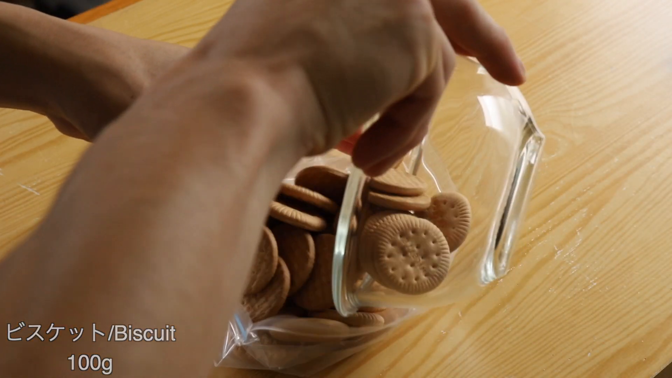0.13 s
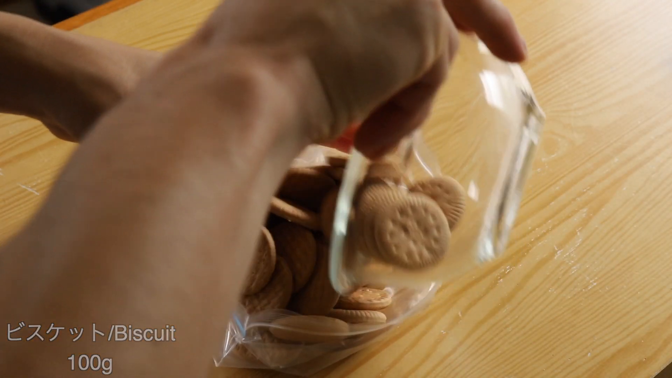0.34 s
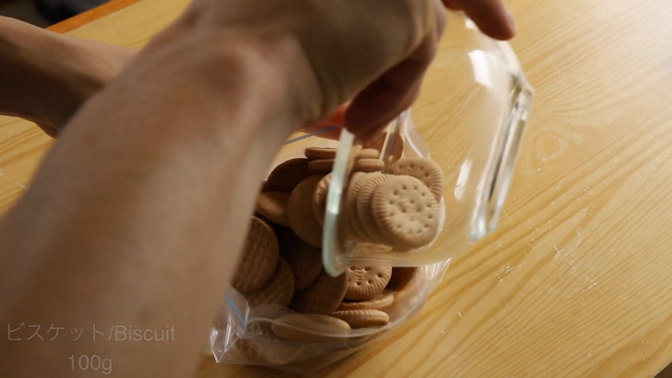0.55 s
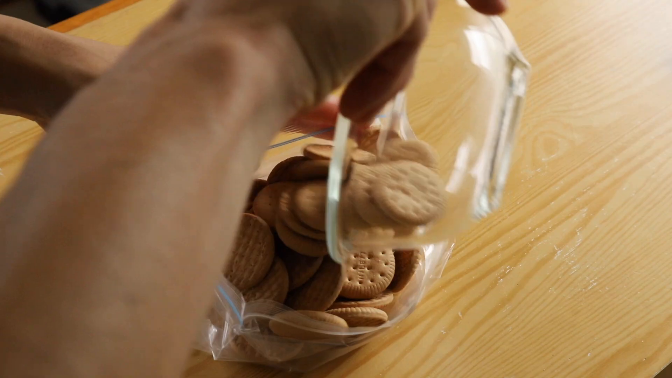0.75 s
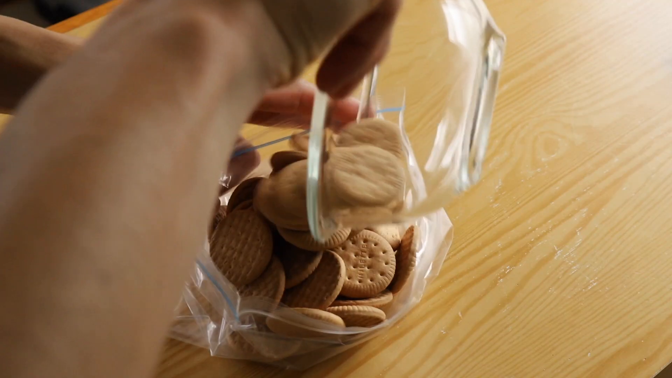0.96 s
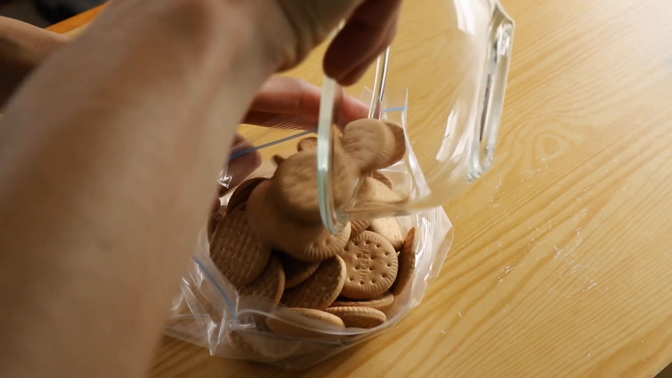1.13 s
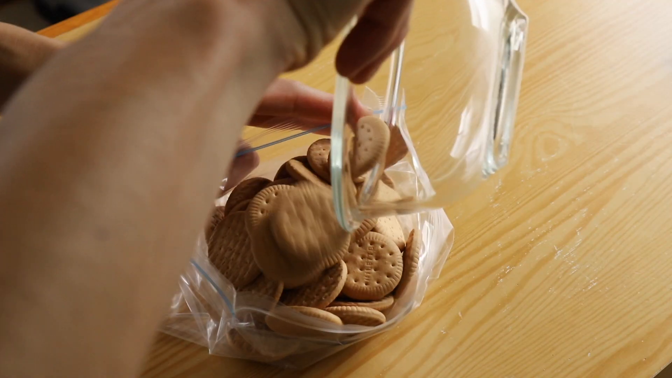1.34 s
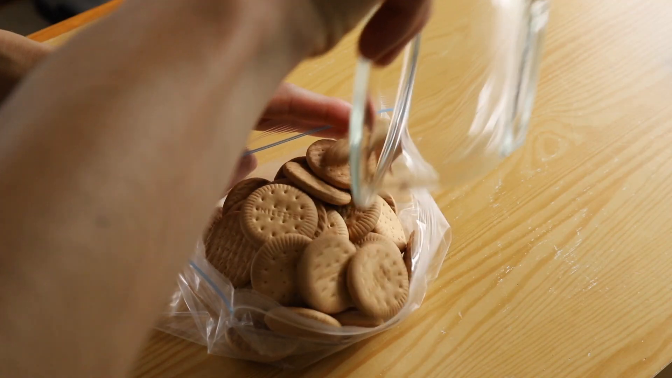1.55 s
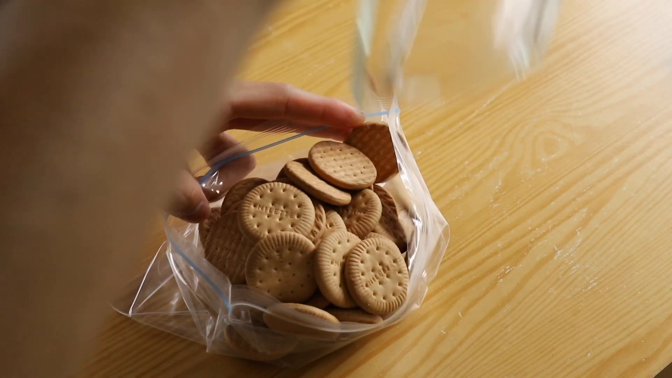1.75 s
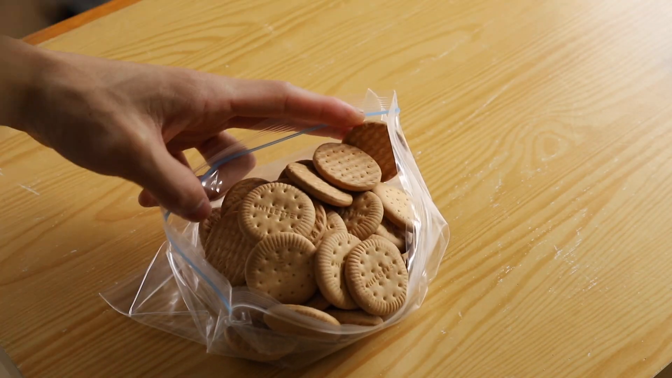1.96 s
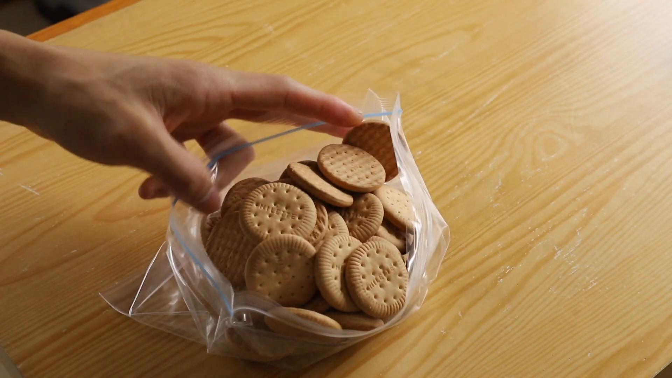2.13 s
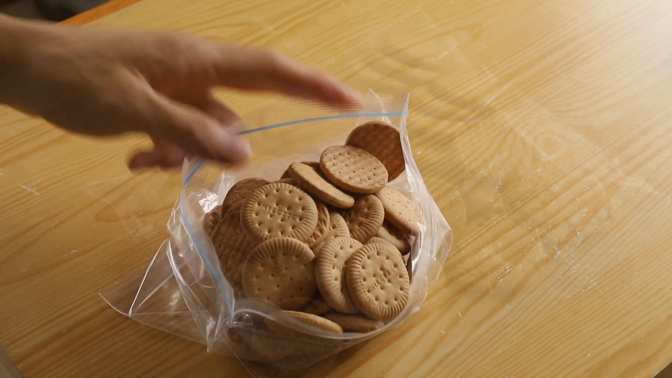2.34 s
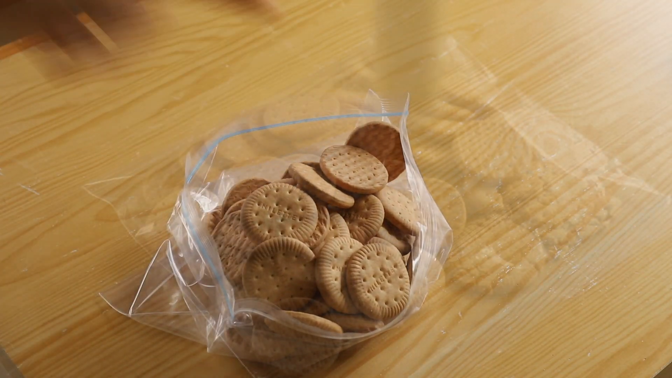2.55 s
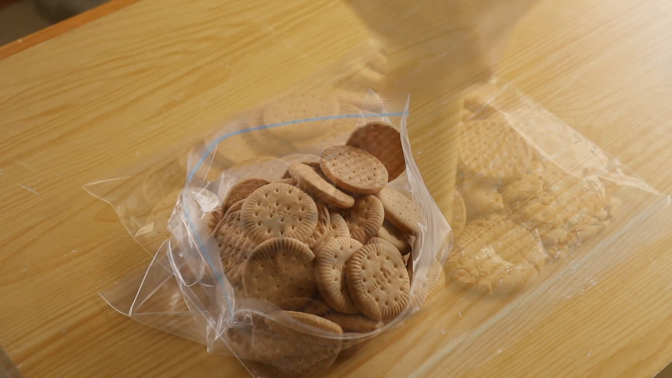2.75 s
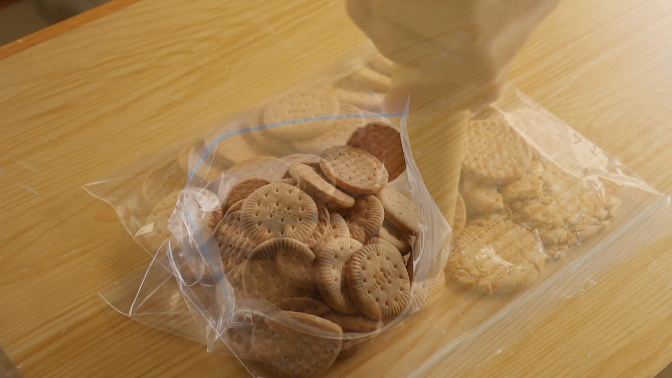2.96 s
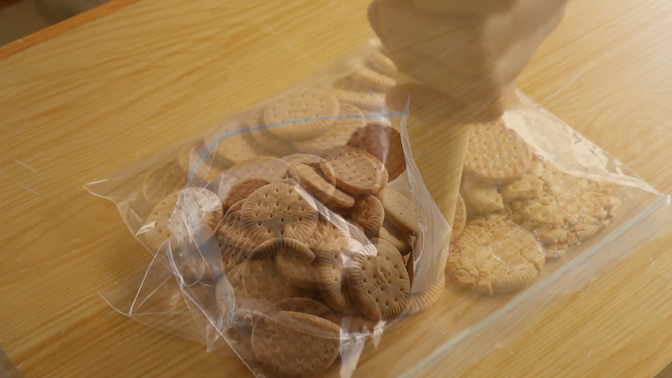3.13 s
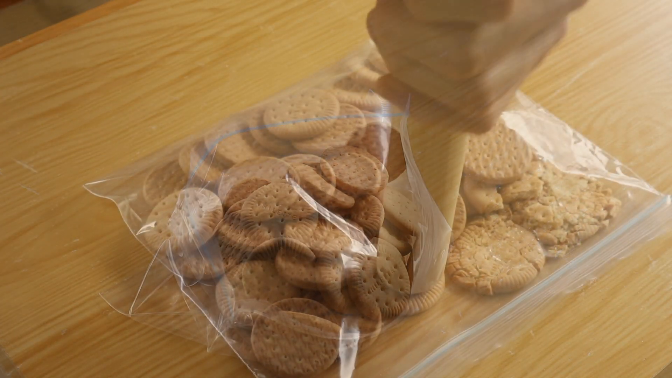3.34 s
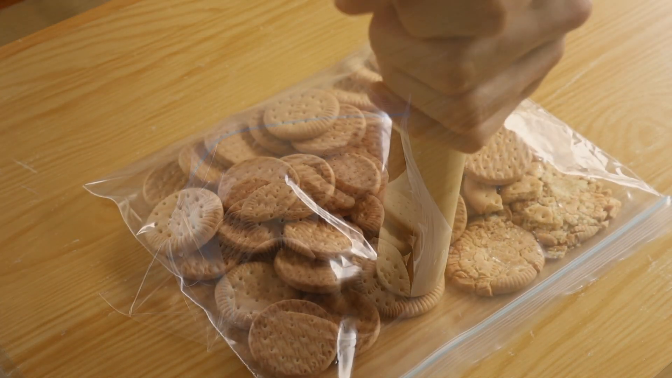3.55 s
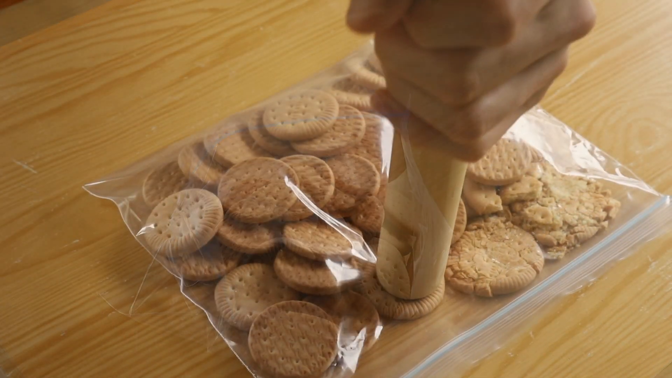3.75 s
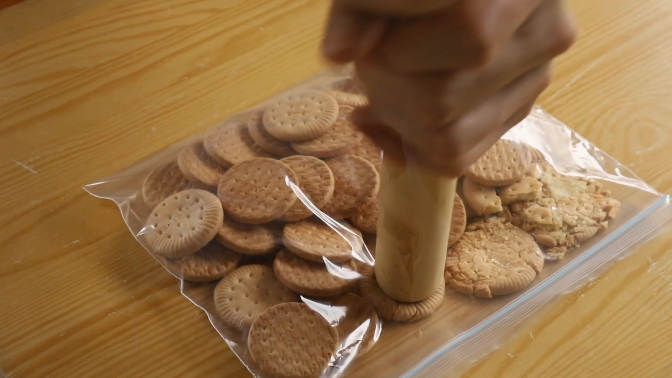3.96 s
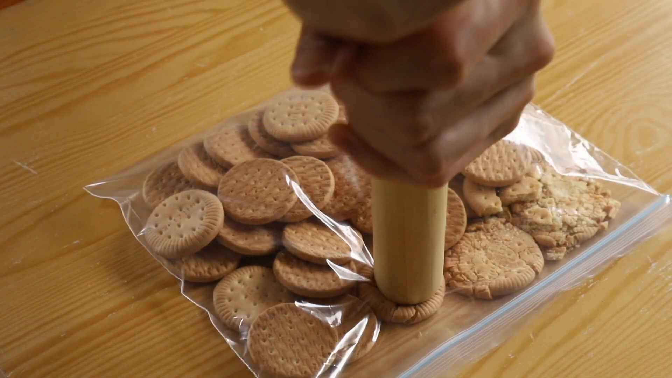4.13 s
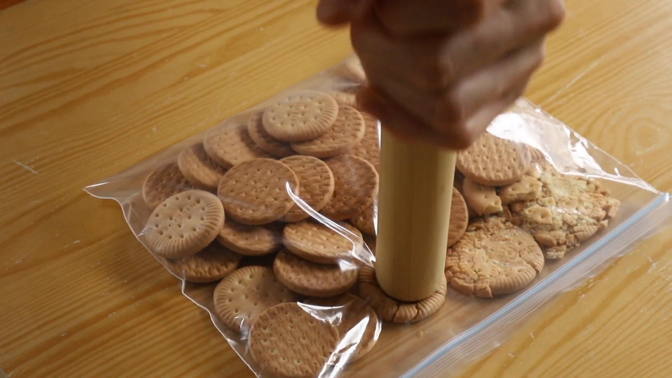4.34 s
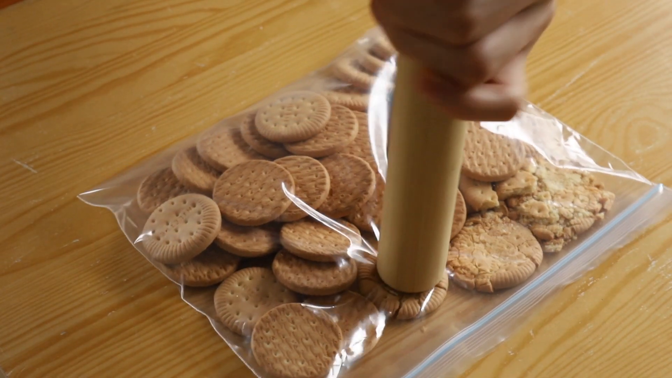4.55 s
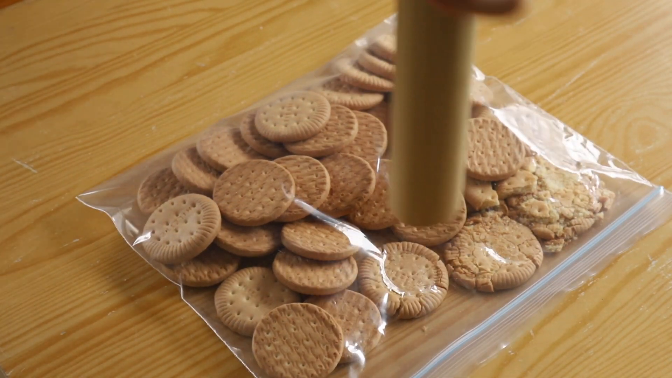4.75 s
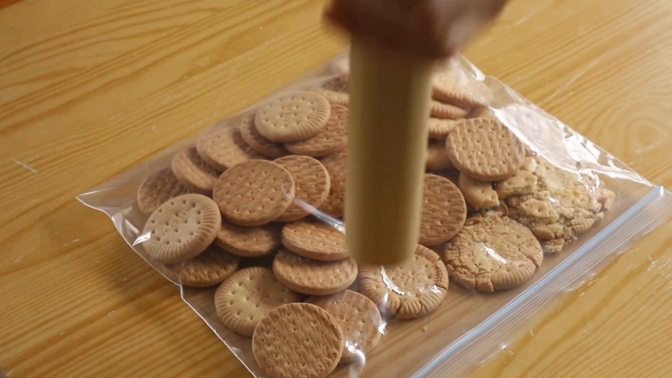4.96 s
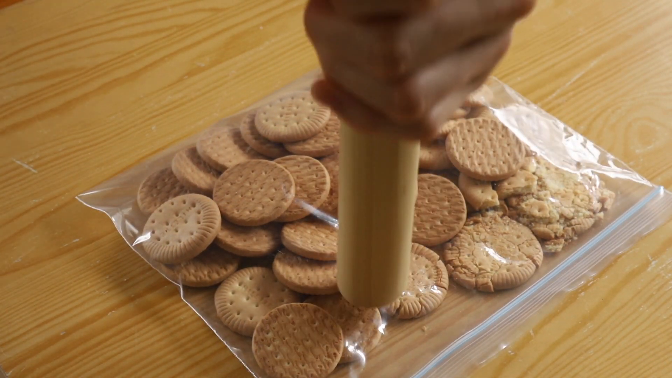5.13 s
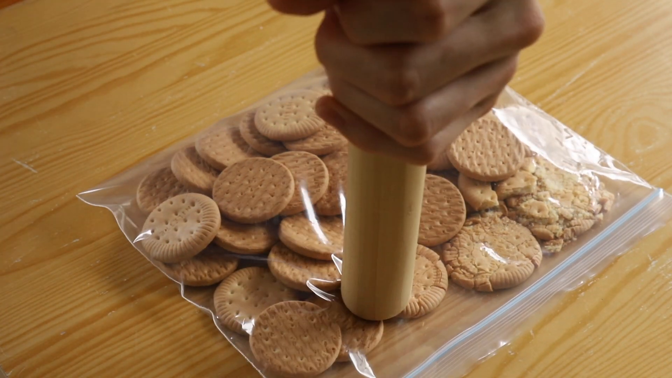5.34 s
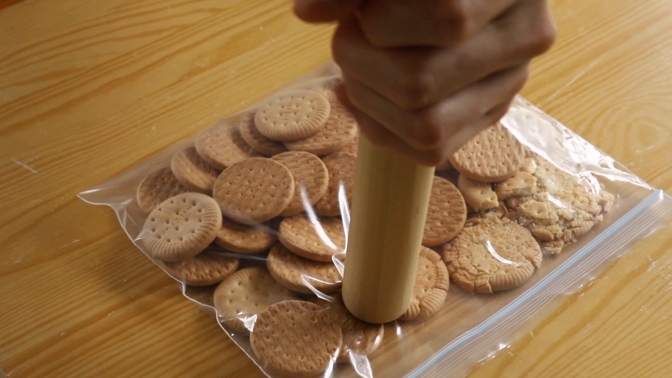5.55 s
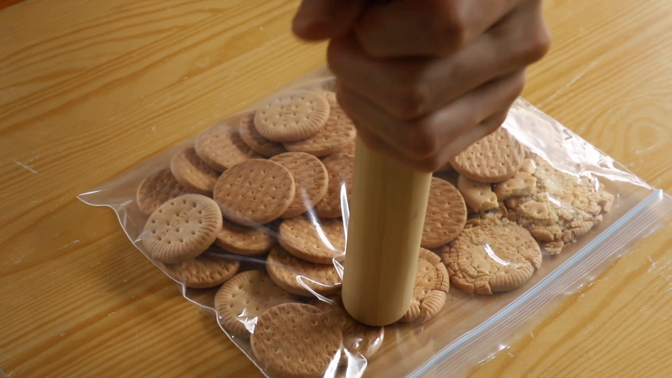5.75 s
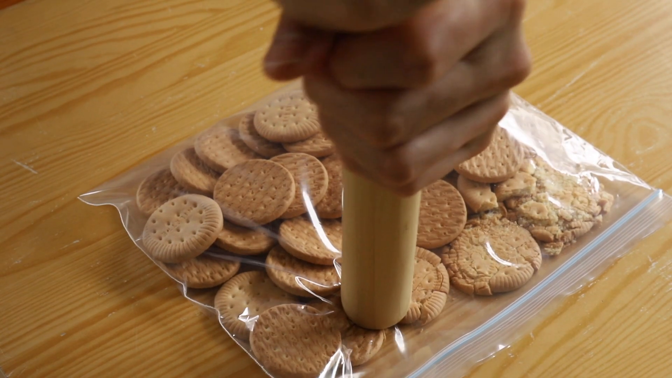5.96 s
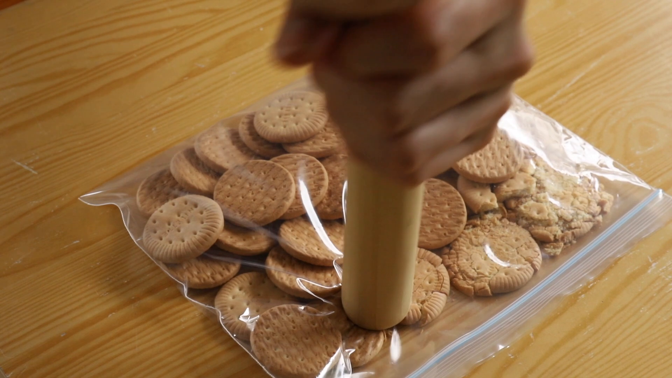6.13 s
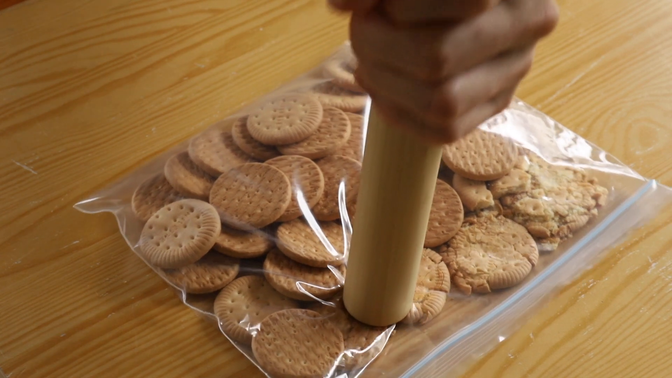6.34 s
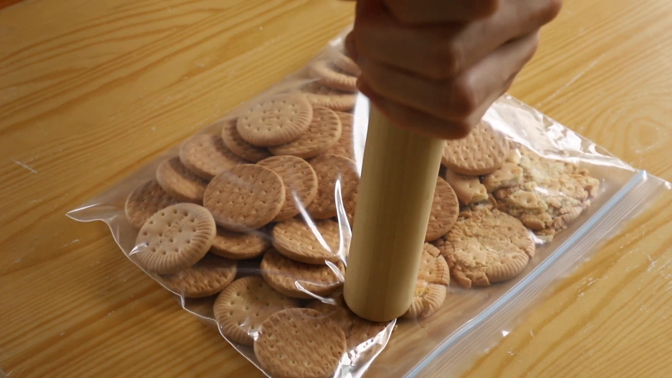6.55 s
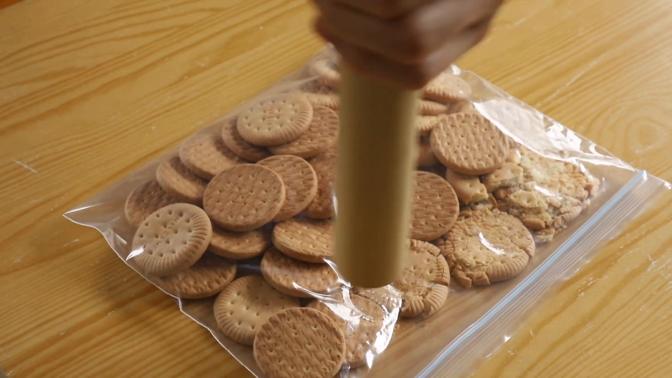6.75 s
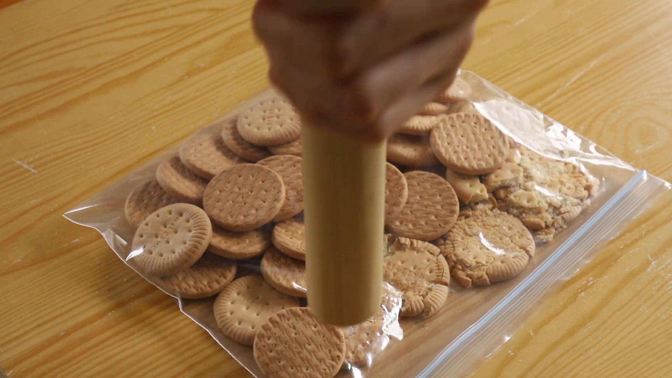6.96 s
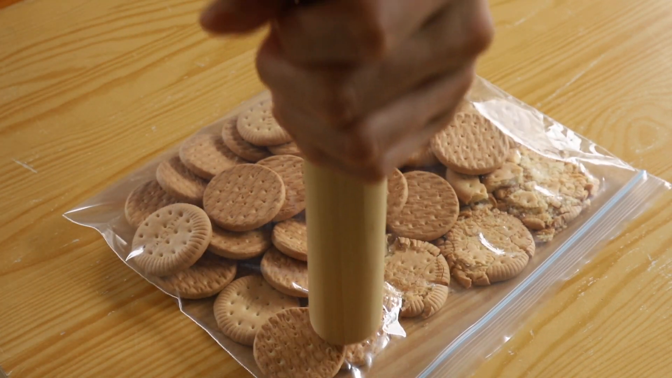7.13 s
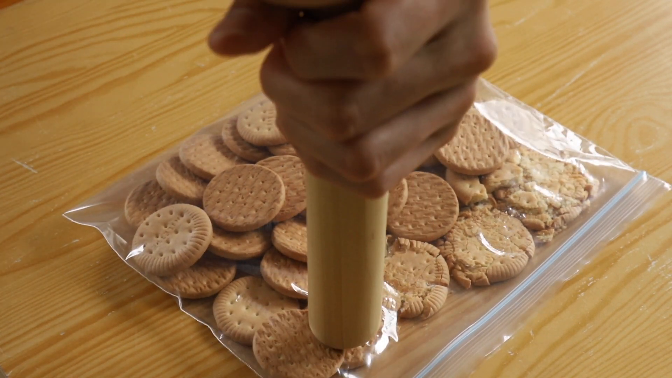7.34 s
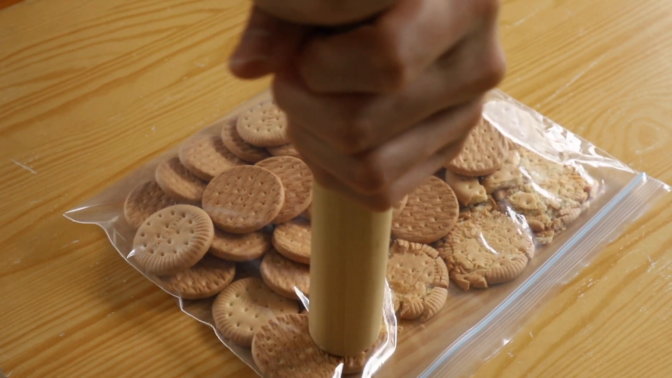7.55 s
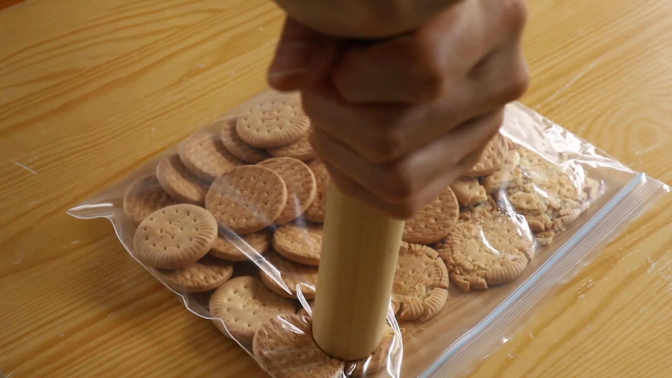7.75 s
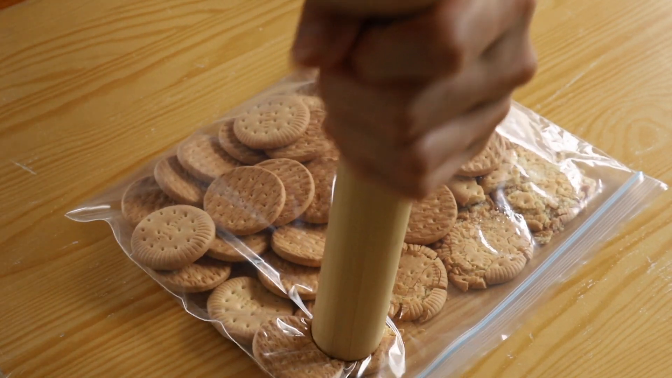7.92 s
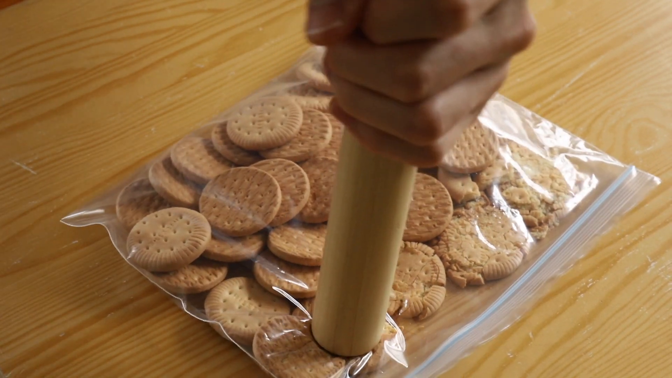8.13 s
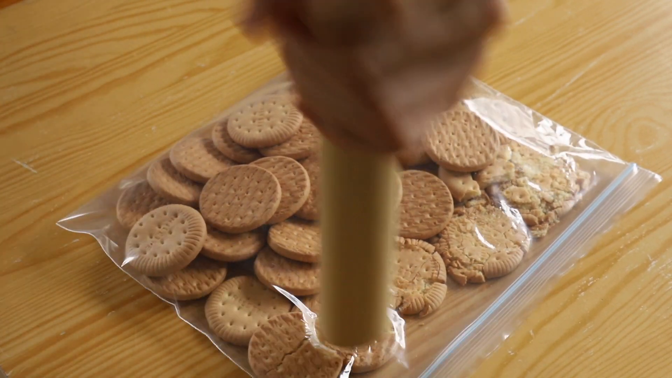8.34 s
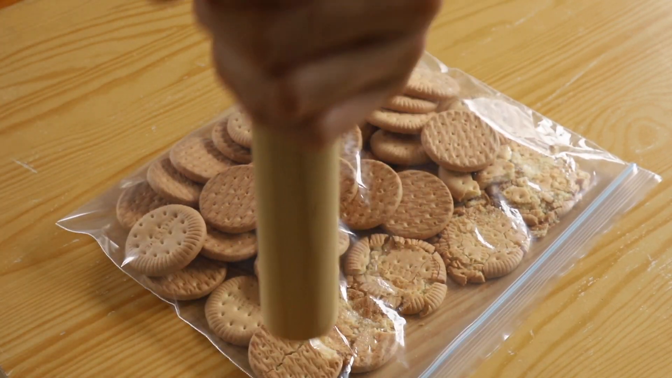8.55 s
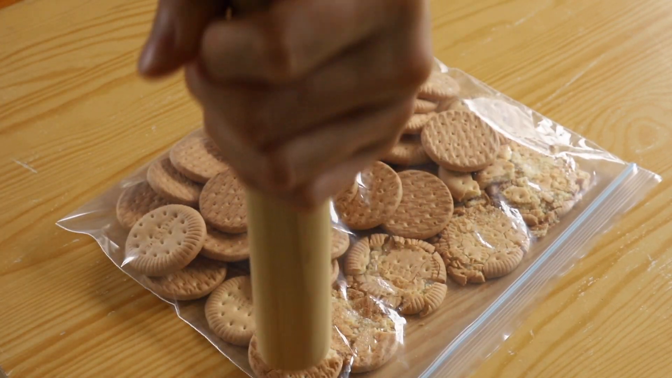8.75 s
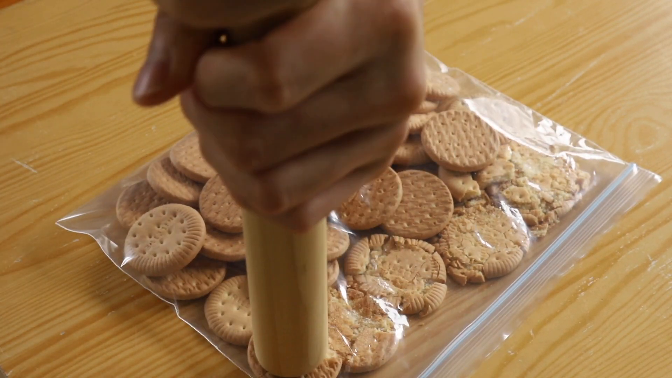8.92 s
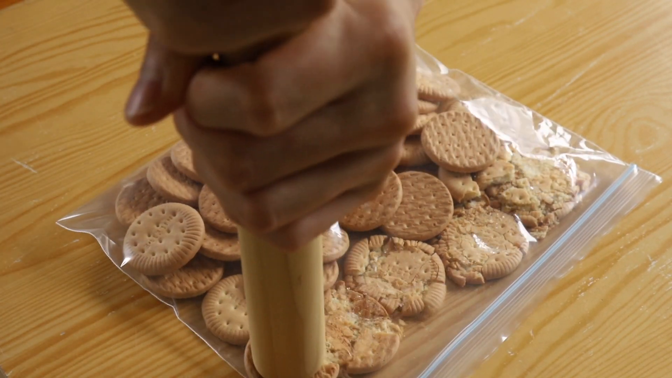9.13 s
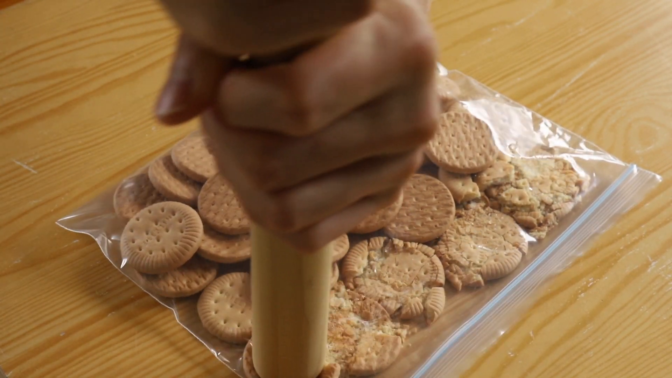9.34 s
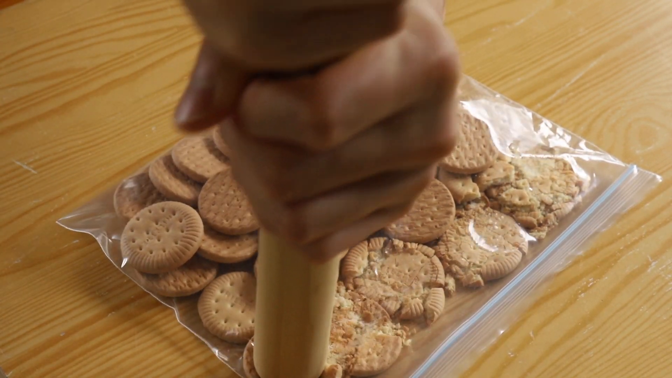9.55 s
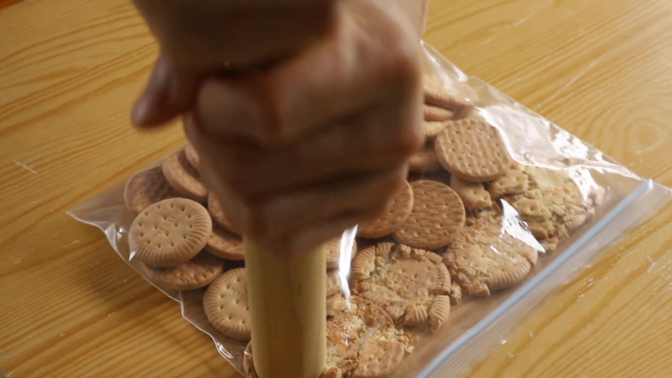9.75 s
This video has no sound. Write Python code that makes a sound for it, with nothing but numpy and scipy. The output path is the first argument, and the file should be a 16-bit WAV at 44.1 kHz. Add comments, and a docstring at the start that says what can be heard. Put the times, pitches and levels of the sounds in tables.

```python
"""A small kitchen, heard close and in stereo: biscuits slide from a glass dish into a plastic bag on a
wooden table, and a hand straightens the bag. Then the end of a rolling pin presses down four times:
biscuits snap, the pin knocks the table through them and the crumbs grind as it twists.
Blows are pulses scattered in the heap, rubbing is showers of tiny slips, and the dish and the table bounce
are decaying sines; table modes, sparse reflections and coloured room noise surround them."""
import sys
import numpy as np
from scipy import signal
from scipy.fft import rfft, irfft, next_fast_len
from scipy.io import wavfile

SR = 44100
rng = np.random.default_rng(int(sys.argv[2]) if len(sys.argv) > 2 else 0)


def master_out(mix):
    """Clip the mix to full scale and print it as 16-bit PCM to the path in sys.argv[1]."""
    frames = np.transpose(np.atleast_2d(mix))
    ceiling = np.clip(frames, -1, 1)
    pcm = np.round(ceiling * 32767).astype(np.int16)
    wavfile.write(sys.argv[1], SR, pcm)


N = 436149
STEP_S = .001  # spacing of the level curves

# presses of the pin: touch t/s, grind start t/s, ease-off t/s, end of resting t/s, resting level/dB,
# grinding level/dB; the last press grinds on to the end
PRESSES = [(3.465, 3.67, 4.54, 4.72, -62.5, -45), (5.247, 5.739, 6.484, 6.7, -66, -42.5),
           (7.216, 7.584, 8.12, 8.37, -61.5, -40.5), (8.907, 9.07, 14.6, 9.04, -74, -46)]
# the biscuit strains and crackles just before it gives way: t/s, level/dB
STRAINS = [(3.475, -45.5), (3.549, -38.5), (5.599, -45.5), (7.51, -33), (9.166, -31)]
# the wrist twists and bears down harder: middle t/s, time to fall 20 dB/s, level/dB
TWISTS = [(4.058, 0.11, -37), (4.302, 0.15, -36), (4.465, 0.047, -40.5), (5.909, 0.067, -34),
          (6.219, 0.12, -32), (6.361, 0.092, -40.5), (7.682, 0.067, -26.5), (7.919, 0.044, -40),
          (8.008, 0.14, -35.5), (9.062, 0.021, -31.5), (9.406, 0.23, -40), (9.63, 0.29, -39.5),
          (9.89, 0.17, -37.5)]
BITE_S, EASE_S = 0.068, 0.027  # the grinding builds up and dies away by 20 dB


def force():
    """How hard the pin works as it rests, strains a biscuit, bears down, twists and eases off: (times, dB)."""
    t = np.arange(PRESSES[0][0] - .1, N / SR, STEP_S)
    resting = [held(t, touch, rest_end, db, attack_s=.01, release_s=0.027)
               for touch, _, _, rest_end, db, _ in PRESSES]
    straining = [held(t, s, s, db, attack_s=.025, release_s=.02) for s, db in STRAINS]
    grinding = [held(t, bite, ease, db, BITE_S, EASE_S) for _, bite, ease, _, _, db in PRESSES]
    return t, together(resting + straining + grinding + [swells(t, TWISTS)])


# biscuits breaking under the pin: t/s, clack level/dB, table thud level/dB, snap level/dB,
# snap decay constant/s, ring f/Hz
BREAKS = [(3.473, -21, -30.5, -33, 0.0024, 950), (3.55, -6.5, -18.5, -22.5, 0.0033, 1200),
          (3.615, -8.5, -24, -27.5, 0.0014, 1840), (3.769, -14, -27, -18, 0.0018, 1830),
          (3.821, -15, -28, -21, 0.002, 1300), (3.888, -17.5, -34, -28.5, 0.00091, 1910),
          (4.304, -22.5, -55, -29, 0.002, 2070), (5.6, -17.5, -22.5, -22, 0.0028, 2635),
          (5.604, -6.5, -14, -27, 0.002, 924), (5.644, -18.5, -33, -56, 0.002, 885),
          (5.74, -28.5, -37.5, -33, 0.0024, 1700), (5.853, -29.5, -37.5, -36, 0.002, 802),
          (5.894, -25.5, -34.5, -29, 0.0023, 820), (5.909, -20.5, -28, -28.5, 0.003, 970),
          (6.054, -36, -44, -37.5, 0.002, 950), (6.225, -19.5, -36, -31.5, 0.0022, 997),
          (7.509, -8, -18.5, -19, 0.002, 797), (7.575, -10.5, -11, -18.5, 0.0048, 1290),
          (7.588, -16.5, -26.5, -25, 0.0031, 810), (7.599, -12, -32, -23, 0.0037, 1385),
          (7.671, -19.5, -24, -24.5, 0.002, 1240), (7.687, -16, -23, -27.5, 0.002, 824),
          (7.743, -23.5, -33.5, -26.5, 0.0024, 800), (9.025, -24, -34, -27.5, 0.0018, 1670),
          (9.059, -24, -28, -25, 0.002, 1230), (9.081, -22, -33, -26, 0.0025, 2210),
          (9.164, -6.5, -13, -14.5, 0.0021, 926), (9.177, -10, -30, -16.5, 0.0026, 1235),
          (9.308, -16, -25.5, -22, 0.0052, 1640), (9.322, -15, -22, -16.5, 0.0042, 1220),
          (9.337, -5, -14.5, -12, 0.0016, 2160), (9.342, -9, -21, -18.5, 0.0024, 1148),
          (9.474, -27.5, -35, -29.5, 0.0017, 2260)]
# light knocks as the hand or the pin meets or leaves the bag: columns as BREAKS
NUDGES = [(2.443, -42, -40, -52, 0.006, 1130), (3.204, -44.5, -34.5, -53.5, 0.0074, 930),
          (4.633, -44, -61, -47, 0.0055, 1076), (5.241, -40.5, -39, -60, 0.0065, 869),
          (5.252, -34, -39, -51.5, 0.006, 2506), (5.275, -30.5, -48, -54, 0.006, 2010),
          (5.296, -26, -39, -47, 0.006, 1910), (5.333, -27, -37, -38, 0.018, 1030),
          (6.462, -53, -41, -66, 0.006, 988), (7.244, -24.5, -47.5, -39, 0.0051, 923),
          (7.374, -36.5, -46.5, -43, 0.0038, 2670), (8.381, -32, -41, -45.5, 0.0075, 1600),
          (8.912, -30.5, -32.5, -36, 0.0078, 906)]
# low scrapes as the pin or the moving hand shifts the biscuits:
# start t/s, end t/s, table rumble level/dB, rubbing level/dB
SCRAPES = [(5.248, 5.345, -46, -50), (6.499, 6.538, -60.5, -70), (7.222, 7.244, -51, -56.5),
           (7.499, 7.505, -37, -43.5), (8.17, 8.38, -74, -57), (8.77, 8.85, -79, -88.5),
           (8.907, 8.932, -54, -58)]
# colour of pieces grinding on the table: f/Hz, level/dB
RUMBLE = [(20, -28), (70, -5), (140, -2), (270, -0.5), (390, -7), (560, 4.5), (850, -6), (1400, -21.5),
          (4000, -63)]
# colour of pieces rubbing on each other: f/Hz, level/dB
RUB = [(150, -40), (420, -8), (700, 1.5), (1000, 5), (1400, 2.5), (1900, 4), (2700, -0.5), (3800, -5),
       (8000, -26.5), (16000, -52)]
# colour of crumbs grinding: f/Hz, level/dB
CRUMB_GRIT = [(300, -19), (1600, -15), (3000, -0.5), (3800, 2.5), (5200, -3.5), (6400, -2.5), (7600, 4),
              (9000, -3.5), (10400, -4), (12200, 0.5), (14000, -3), (16000, -14)]
FINER_DB_PER_S = 6.5  # the table rumbles less as a press grinds the pieces finer


def crushing():
    """The pin settles, breaks through the biscuits and grinds the pieces into crumbs."""
    t, work = force()
    rumble, rub, grit = settling(t, BREAKS, delay_s=0.0098, rumble_s=.07, rub_s=0.069, grit_s=0.067)
    scrape_rumble = together(held(t, start, end, db, attack_s=.004, release_s=0.096)
                             for start, end, db, _ in SCRAPES)
    scrape_rub = together(held(t, start, end, db, attack_s=.004, release_s=0.096)
                          for start, end, _, db in SCRAPES)
    ground_s = sum((t - bite) * ((t > bite) & (t < ease)) for _, bite, ease, _, _, _ in PRESSES)
    grinding_rumble = friction(t, work - 14 - FINER_DB_PER_S * ground_s, RUMBLE, per_s=600, spread_db=4.0,
                               clump_db=2.5, t60=0.012, colour_db=5, side_db=-14.5, count=2)
    loose_rumble = friction(t, together([rumble - 16, scrape_rumble]), THUD, per_s=590, spread_db=3.5,
                            clump_db=3, t60=0.012, colour_db=3.5, side_db=-13, count=2)
    rubbing = friction(t, together([work - 9, rub - 25, scrape_rub]), RUB, per_s=1700, spread_db=3.5,
                       clump_db=2, t60=0.031, colour_db=5, side_db=-24.5, count=6)
    gritting = friction(t, together([work - 1, grit - 18, scrape_rub - 11]), CRUMB_GRIT, per_s=2800,
                        spread_db=1.0, clump_db=3.0, t60=0.0069, colour_db=4.5, side_db=-21.5)
    breaks = strikes(BREAKS, thud_db=20, clack_db=14.5, snap_db=23.0, clack_t60=0.062, heap_db=7,
                     crumble_db=-1.5, clack_hz=1450, drop_s=0.0011, thud_t60=.028,
                     ring_db=8.5, ring_t60=0.047)
    nudges = strikes(NUDGES, thud_db=17.5, clack_db=16, snap_db=21.5, clack_t60=0.06, heap_db=17,
                     crumble_db=9.5, clack_hz=1446, drop_s=.0005, thud_t60=0.035,
                     ring_db=9.5, ring_t60=0.027)
    return grinding_rumble + loose_rumble + rubbing + gritting + breaks + nudges


# the dish is held tipped and biscuits creep over it: start t/s, end t/s, level/dB
TIPPED = (0, 1.88, -48)
# batches of biscuits sliding out: middle t/s, time to fall 20 dB/s, level/dB
SLIDES = [(0.0, .04, -17), (0.115, 0.21, -36.5), (0.354, .07, -33), (0.444, 0.17, -28),
          (0.593, 0.18, -32.5), (0.727, 0.054, -29), (0.835, 0.16, -38.5), (1.082, 0.17, -36),
          (1.22, 0.084, -33), (1.3, 0.073, -31.5), (1.65, 0.21, -33.5)]


def flow():
    """How fast the biscuits slide out of the dish: (times, dB)."""
    t = np.arange(0, TIPPED[1] + 0.22, STEP_S)
    return t, together([held(t, *TIPPED, attack_s=.05, release_s=0.067), swells(t, SLIDES)])


# biscuits landing on the heap: columns as BREAKS
FALLS = [(0.007, -15, -21, -27.5, 0.003, 1120), (0.039, -10, -21, -27.5, 0.003, 1590),
         (0.049, -2.5, -18.5, -22.5, 0.003, 1145), (0.057, -10, -20.5, -37.5, 0.003, 1250),
         (0.087, -9.5, -29.5, -37, 0.003, 1200), (0.11, -16.5, -24, -41, 0.003, 1910),
         (0.202, -11, -24, -26.5, 0.003, 1980), (0.411, -13.5, -22.5, -39.5, 0.003, 1220),
         (0.471, -11.5, -28.5, -14.5, 0.003, 1160), (0.731, -17.5, -29, -37, 0.003, 1140),
         (1.036, -19.5, -32.5, -31, 0.003, 1500), (1.053, -28, -24.5, -25, 0.003, 1070),
         (1.091, -20, -31, -42, 0.003, 931), (1.127, -20, -45.5, -25, 0.003, 2760),
         (1.473, -8.5, -26, -18.5, 0.003, 2020), (1.485, -16, -29.5, -30, 0.0034, 1490),
         (1.489, -4, -19, -22.5, 0.003, 830), (1.526, -14.5, -24, -32, 0.003, 1200),
         (1.561, -23, -27, -22.5, 0.003, 1230), (1.594, -13.5, -25, -23, 0.003, 1200),
         (1.697, -7.5, -31.5, -29.5, 0.003, 1050), (1.707, -14, -30, -24, 0.003, 1170),
         (1.717, -8, -25.5, -20, 0.003, 1070), (1.728, -5.5, -30, -21.5, 0.003, 1075),
         (1.747, -18.5, -39, -17, 0.003, 2890), (1.759, -24.5, -41.5, -19, 0.003, 2760),
         (1.788, -28, -40, -18, 0.003, 1010), (1.804, -26.5, -37.5, -20.5, 0.003, 813),
         (1.848, -11, -35, -27.5, 0.003, 776), (1.856, -9.5, -37, -24.5, 0.003, 2100)]
# hollow colour of sliding biscuits: f/Hz, level/dB
HOLLOW = [(20, -24), (90, -12), (145, 6), (210, -2), (390, -1), (560, 2.5), (850, -4), (1400, -19),
          (4000, -58.5)]
# colour of whole biscuits rubbing: f/Hz, level/dB
SLIDE_RUB = [(150, -28), (420, -11), (700, 4), (1200, 3.5), (1550, -0.5), (2050, -3), (2500, -11),
             (3500, -16), (8000, -36), (16000, -54)]
# colour of their rough faces scraping: f/Hz, level/dB
SLIDE_GRIT = [(300, -31), (2000, 0), (3300, -6), (4350, 2.5), (5100, -1), (6000, 0.5), (6600, -8.5),
              (7400, -4.5), (10400, -10), (12500, -6), (16000, -16.5)]


def pouring():
    """Biscuits scrape over glass and each other, drop on the heap and settle."""
    t, speed = flow()
    rumble, rub, grit = settling(t, FALLS, delay_s=0.0087, rumble_s=0.045, rub_s=0.096, grit_s=0.062)
    creep = held(t, *TIPPED, attack_s=.05, release_s=.2) + 3
    hollow = friction(t, together([speed - 8, rumble - 18, creep]), HOLLOW, per_s=700, spread_db=2.5,
                      clump_db=1.5, t60=0.019, colour_db=3.0, side_db=-14.5, count=2)
    rubbing = friction(t, together([speed - 5, rub - 27]), SLIDE_RUB, per_s=450, spread_db=1.5,
                       clump_db=1, t60=0.017, colour_db=3, side_db=-25)
    scraping = friction(t, together([0.69 * speed - 18, grit - 19]), SLIDE_GRIT, per_s=9000,
                        spread_db=3.5, clump_db=2.5, t60=0.0044, colour_db=5.0, side_db=-11.0)
    landings = strikes(FALLS, thud_db=19, clack_db=14.5, snap_db=20, clack_t60=0.039, heap_db=4.5,
                       crumble_db=6.5, clack_hz=1270, drop_s=0.00048, thud_t60=.03,
                       ring_db=9, ring_t60=.022)
    return hollow + rubbing + scraping + landings


def tumbling(count=60, spread_db=9):
    """Biscuits tap each other at random on their way down, harder the faster they slide."""
    t, speed = flow()
    when, size, pitch = rng.random((count, 3)).T
    s = TIPPED[0] + when * (TIPPED[1] - TIPPED[0])
    db = np.interp(s, t, speed) + spread_db * size ** 2
    rows = [(at, level, level - 10.5, level - 13.5, .002, 800 * 3 ** u)
            for at, level, u in zip(s, db, pitch)]
    return strikes(rows, thud_db=13, clack_db=15.5, snap_db=19.5, clack_t60=0.02, heap_db=2,
                   crumble_db=2.5, clack_hz=1460, drop_s=.0004, thud_t60=.025,
                   ring_db=13, ring_t60=0.018)


# the hand holds the bag: start t/s, end t/s, level/dB
HOLDING = (2.04, 2.326, -49)
# tugs at the bag: middle t/s, time to fall 20 dB/s, level/dB
TUGS = [(2.055, .04, -44), (2.187, 0.082, -44.5), (2.322, 0.057, -39.5), (2.846, 0.037, -74)]


def pull():
    """How hard the hand moves the bag: (times, dB)."""
    t = np.arange(HOLDING[0] - .2, TUGS[-1][0] + .2, STEP_S)
    return t, together([held(t, *HOLDING, attack_s=0.029, release_s=0.088), swells(t, TUGS)])


# colour of the crinkling plastic film: f/Hz, level/dB
FILM = [(300, -27), (1800, -14), (3500, 7.5), (5700, -15), (7700, 3.5), (10400, -10.5), (12500, -1),
        (16000, -17)]


def handling():
    """The hand shifts the bag: the biscuits rub inside and the film crinkles."""
    t, effort = pull()
    grip = held(t, *HOLDING, attack_s=0.18, release_s=0.16) - 1
    hollow = friction(t, together([effort - 13, grip]), HOLLOW, per_s=700, spread_db=0.0,
                      clump_db=2.0, t60=0.0092, colour_db=3.0, side_db=-15, count=2)
    rubbing = friction(t, 0.72 * effort - 12.5, SLIDE_RUB, per_s=2400, spread_db=2.5,
                       clump_db=9.5, t60=0.02, colour_db=5, side_db=-30.0)
    crinkle = friction(t, effort - 1.5, FILM, per_s=1200, spread_db=2.5,
                       clump_db=5.0, t60=0.006, colour_db=5, side_db=-11)
    return hollow + rubbing + crinkle


# the bag springing back as the pin lifts: t/s, time to fall 20 dB/s, level/dB
LIFTS = [(4.636, 0.097, -53), (6.666, 0.066, -48.5), (6.897, 0.076, -75), (8.365, 0.046, -41.5)]
# colour of crumbs shuffling: f/Hz, level/dB
SHUFFLE = [(200, -26), (500, -19), (750, 10), (1200, 6.5), (1600, 3), (2200, -13), (4000, -25),
           (16000, -38)]


def lifting():
    """As the pin lifts, the bag springs back and the crumbs in it shuffle and slump on the table."""
    out = np.zeros((2, N))
    for s, length, db in LIFTS:
        t = np.arange(s - .06, s + length + .15, STEP_S)
        peak_s = s + length / 3
        level = held(t, peak_s, peak_s, db, attack_s=0.049, release_s=length)
        out += friction(t, level - 1.5, SHUFFLE, per_s=3000, spread_db=4.0, clump_db=3,
                        t60=0.0036, colour_db=1.5, side_db=-15.5, count=6)
        out += friction(t, level - 5, RUMBLE, per_s=1200, spread_db=4, clump_db=3,
                        t60=0.0042, colour_db=5, side_db=-18, count=1)
    return out


# dry ticks of film creases flipping and of single crumbs popping under the pin:
# t/s, relative level/dB, f/Hz
TICKS = [(0.2638, -13, 3400), (0.85, -16, 7990), (2.1567, -19, 7530), (2.1807, -19.5, 3080),
         (2.3144, -14, 3400), (2.3264, -20, 3670), (2.3957, -24, 3600), (2.846, -35, 4900),
         (4.2854, -21, 7220), (4.355, -17.5, 4830), (5.5565, -33.5, 3630), (6.1714, -18, 2860),
         (6.2265, -11, 2890), (6.261, -14, 2760), (6.3604, -17, 6870), (6.409, -23, 2970),
         (6.4494, -27, 8120), (6.641, -29, 7900), (7.211, -30.5, 3000), (8.2382, -20, 3230),
         (8.2681, -17.5, 7800), (8.7136, -51.5, 3330), (9.625, -13.5, 7760), (9.6459, -11.5, 8150)]


def ticks(level_db=4, band_db=-7):
    """A film crease flips or a crumb pops with a dry tick, brightest around its own pitch."""
    out = np.zeros((2, N))
    for s, db, hz in TICKS:
        pulse = click([(hz / 8, -30), (hz / 2, band_db), (hz, 0), (hz * 2, band_db), (hz * 6, -24)])
        tick = convolve(scatter(t60=0.0044, scatter_db=-0.5, side_db=-17), pulse)
        add(out, s + 0.0018, amp(db + level_db) * unit(tick))
    return out


def popping():
    """Single crumbs give way, film snaps and biscuit edges tap, at random pitches and louder in harder work."""
    out = np.zeros((2, N))
    # level curve, mean pops per second, level/dB, lowest and highest f/Hz
    sources = (force(), 44, 8, 1600, 10000), (pull(), 20, 8, 3000, 8000), (flow(), 24, 5, 1000, 3500)
    for (t, effort), per_s, level_db, low_hz, high_hz in sources:
        when, pitch, size, chance = rng.random((300, 4)).T
        duration_s = t[-1] - t[0]
        kept = chance < per_s * duration_s / len(when)
        for at, u, v, keep in zip(t[0] + when * duration_s, pitch, size, kept):
            if keep:
                hz = low_hz * (high_hz / low_hz) ** u
                colour = [(hz / 6, -26), (hz * 2, -10), (hz, 0), (hz * 2.3, -10), (hz * 5, -22)]
                db = 0.79 * np.interp(at, t, effort) + level_db + 2.9 * v ** 2
                add(out, at, amp(db) * click(colour, size=512))
    return out


# body of a push on the table: f/Hz, level/dB
THUD = [(20, -30.5), (70, -17), (130, -13), (210, -3), (280, 1.5), (400, 0.5), (600, 0), (850, -9),
        (1400, -27.5), (4000, -52.5)]
# clack of a biscuit: f/Hz for a piece pitched at 1400 Hz, level/dB
CLACK = [(150, -32.5), (450, -13), (750, 0.5), (1200, 1.5), (2000, -0.5), (2800, -2.5), (4200, -11),
         (8000, -33.5), (16000, -61)]
# brittle snap: f/Hz, level/dB
SNAP = [(300, -34), (1800, -10.5), (3500, 2.5), (5200, -2.5), (7500, 0.5), (10300, -9.5), (12500, -7),
        (16000, -11.5)]
ONSET_S = .0008  # short delay from the listed time to the start of the blow


def strikes(rows, thud_db, clack_db, snap_db, clack_t60, heap_db, crumble_db, clack_hz, drop_s, thud_t60,
            ring_db, ring_t60):
    """A blow: a snap with tiny fractures, a clack with a short ring and, a moment later, a table push."""
    out, t = np.zeros((2, N)), np.arange(3000) / SR
    push, snap_pulse = click(THUD), click(SNAP)
    for listed_s, clack, thud, snap, length, ring_hz in rows:
        s = listed_s + ONSET_S
        # cubed noise gives few strong fractures among many weak ones
        mid, side = rng.standard_normal((2, len(t))) ** 3 * np.exp(-t / length)
        trail = amp(crumble_db) * np.sqrt(length / 0.00065) * unit(mid)
        fractures = signal.unit_impulse(len(t)) + trail
        burst = convolve(widen(unit(fractures), unit(side), side_db=-11.5), snap_pulse)
        add(out, s, amp(snap + snap_db) * unit(burst))

        hz = clack_hz * 2 ** (0.022 * (snap - thud))  # small pieces snap more than they thud, and clack higher
        piece = click([(f * hz / 1400, db) for f, db in CLACK])
        clatter = convolve(scatter(clack_t60, heap_db, side_db=-11.5), piece)
        add(out, s, amp(clack + clack_db) * unit(clatter))

        ring = amp(-60 * t / ring_t60) * np.sin(2 * np.pi * ring_hz * t)
        add(out, s, amp(clack + ring_db) * unit(ring))

        knock = convolve(scatter(thud_t60, scatter_db=-6.5, side_db=-14.5), push)
        add(out, s + drop_s, -amp(thud + thud_db) * unit(knock))
    return out


def friction(s, db, spectrum, per_s, spread_db, clump_db, t60, colour_db, side_db, count=8):
    """A shower of small slips of uneven size that come in clumps and follow a level curve."""
    t, out = np.arange(s[0], s[-1], 1 / SR), np.zeros((2, N))
    chance, sign, jitter = rng.random((3, N))[:, :len(t)]
    knots = rng.standard_normal(N // 50)
    clumps = np.interp(t * 110, np.arange(len(knots)), knots)  # a new clump about every 9 ms
    uneven = np.minimum(rng.exponential(1, N)[:len(t)], 5)
    size = amp(spread_db * uneven + clump_db * np.clip(clumps, -2, 2))
    slips = size * np.sign(sign - .5) * (chance < per_s / SR)
    # the contact wanders from piece to piece, each with its own colour
    spot = np.floor(t * 25 + 3 * jitter) % count
    tones = [click([(f, level + colour_db * (rng.random() - .5) * 2) for f, level in spectrum], size=1024)
             for _ in range(count)]
    shower = 0
    for k, tone in enumerate(tones):
        response = unit(convolve(scatter(t60, 0, side_db, size=512), tone))
        shower = shower + convolve(slips * (spot == k), response)
    add(out, s[0], amp(np.interp(t, s, db)) * unit(shower[:, :len(t)]) * np.sqrt(len(t)))
    return out


def settling(t, rows, delay_s, rumble_s, rub_s, grit_s):
    """Loose pieces rattle to rest after each blow, as strong as its parts: (rumble, rubbing, grit) in dB."""
    thud, clack, snap = 2, 1, 3  # columns of the blow
    return [together(held(t, row[0] + delay_s, row[0] + delay_s, row[column], delay_s / 2, release_s)
                     for row in rows)
            for column, release_s in ((thud, rumble_s), (clack, rub_s), (snap, grit_s))]


# biscuits clipping the rim of the dish: t/s, level/dB
CLINKS = [(0.2, -46), (.472, -51), (1.129, -36), (1.473, -47)]
# modes of the glass dish: f/Hz, level/dB, t60/s
GLASS = [(2800, 2.5, 0.17), (4400, -2.5, 0.1), (5430, -3, .1), (8120, -2.5, 0.15)]


def dish(size=14000):
    """A biscuit clips the rim and the glass rings faintly, damped by the hand: a sum of decaying sines."""
    out, t = np.zeros((2, N)), np.arange(size) / SR
    ring = sum(amp(db - 60 * t / t60) * np.sin(2 * np.pi * hz * t) for hz, db, t60 in GLASS)
    for s, db in CLINKS:
        add(out, s, amp(db) * ring)
    return out


# the table bouncing: t/s, level/dB
BUMPS = [(.05, -33), (1.75, -28.5), (3.549, -31.5), (5.605, -30.5)]


def bumps(hz=55, t60=0.049):
    """The whole table bounces under a few pushes, each a low, quickly damped sine."""
    out, t = np.zeros((2, N)), np.arange(8000) / SR
    for s, db in BUMPS:
        add(out, s, amp(db - 60 * t / t60) * np.sin(2 * np.pi * hz * t))
    return out


# modes of the table top: f/Hz, width/Hz, level/dB
TABLE = [(85, 35, 7.5), (138.6, 11, 10.5), (205.7, 11, 9), (272.3, 18, 8), (389.4, 40.5, 12),
         (525.5, 50, 4.5), (668, 69, 5.5), (970, 40, 1), (1200, 50, 4), (1890, 130, 2)]


def table(x):
    """The table top carries the sound: its modes lift and prolong their own frequencies."""
    for hz, width, db in TABLE:
        x = x + (amp(db) - 1) * signal.lfilter(*signal.iirpeak(hz, hz / width, fs=SR), x)
    return x


# decay of the kitchen: f/Hz, t60/s
KITCHEN = [(100, 0.25), (300, 0.23), (800, 0.17), (2000, 0.16), (5000, 0.17), (13000, 0.14)]


def kitchen(x, size=18000):
    """Sparse reflections of random sign, each band dying at its own speed."""
    taps = rng.choice([-1., 1.], (2, size)) * (rng.random((2, size)) < 3000 / SR)
    taps *= np.clip(np.arange(size) / SR / 0.0042 - 1, 0, 1)  # the nearest walls answer after a few ms
    hz, t, z = signal.stft(widen(*taps, side_db=-2.0), SR, nperseg=256)
    decay = amp(-60 * t / read(KITCHEN, hz)[:, None])
    tail = signal.istft(z * decay, SR, nperseg=256)[1]
    return convolve(x, unit(tail))


def air(spectrum, side_db):
    """Steady coloured noise; rms 1."""
    noise = widen(*rng.standard_normal((2, N)), side_db)
    return unit(convolve(noise, click(spectrum, size=8192))) * np.sqrt(N)


# colour of the steady room noise: f/Hz, level/dB
QUIET = [(12, -18.5), (20, -4.5), (22, -5), (65, 0), (127, -5.5), (204, 1), (234, -5), (574, -14),
         (976, -17.5), (1260, -13.5), (2750, -23), (11400, -30.5), (16000, -37)]
# colour of a louder hiss that fades away after the pouring: f/Hz, level/dB
HISS = [(12, -37.5), (20, -13), (43, -2), (127, -6), (198, -0.5), (434, -12), (485, -5), (624, -12.5),
        (1030, -8.5), (5530, -26.5), (16000, -29.5)]
# fade of the hiss: t/s, level/dB
HISS_FADE = [(0, -4.5), (2.6, -1), (3.15, -6), (3.6, -12), (4.201, -52.5)]


def room_noise():
    """A quiet steady floor plus the fading hiss, both coloured noise."""
    fade_db = np.interp(np.arange(N) / SR, *np.transpose(HISS_FADE))
    return amp(-69.5) * air(QUIET, side_db=0.0) + amp(-51 + fade_db) * air(HISS, side_db=-1.5)


def amp(db):
    """Amplitude from dB."""
    return 10 ** (np.asarray(db) / 20)


def unit(x):
    """Scales a sound to a mean energy of 1 per channel."""
    return x / np.sqrt(np.sum(x ** 2) / len(np.atleast_2d(x)) + 1e-20)


def read(points, hz):
    """Reads a table on a log-frequency axis."""
    f, value = np.transpose(points)
    return np.interp(np.log(hz + 1), np.log(f + 1), value)


def add(mix, s, sound):
    """Mixes a sound in at a time."""
    part = mix[:, max(round(s * SR), 0):][:, :sound.shape[-1]]
    part += sound[..., :part.shape[1]]


def convolve(x, response):
    """Filters channel by channel."""
    return signal.oaconvolve(np.atleast_2d(x), np.atleast_2d(response), axes=1)[:, :N]


def click(spectrum, size=2048):
    """The shortest causal pulse that has this spectrum (minimum phase)."""
    log_gain = np.log(amp(read(spectrum, abs(np.fft.fftfreq(size, 1 / SR)))))
    return unit(np.fft.ifft(np.exp(np.conj(signal.hilbert(log_gain)))).real[:size // 2])


def widen(mid, side, side_db):
    """Left and right from a common and an opposed part."""
    return np.array([mid + amp(side_db) * side, mid - amp(side_db) * side])


def scatter(t60, scatter_db, side_db, size=2048):
    """A pulse followed by its random reverberation inside the heap."""
    mid, side = rng.standard_normal((2, size)) * amp(-60 * np.arange(size) / SR / t60)
    return widen(unit(signal.unit_impulse(size) + amp(scatter_db) * unit(mid)), unit(side), side_db)


def together(levels):
    """Adds level curves in dB by their power."""
    return 10 * np.log10(sum(amp(db) ** 2 for db in levels) + 1e-12)


def held(t, start, end, db, attack_s, release_s):
    """Attack, hold, release in dB; the two times are for a change of 20 dB."""
    return db - 20 * (np.maximum(start - t, 0) / attack_s + np.maximum(t - end, 0) / release_s)


def swells(t, rows):
    """Each movement swells and fades in one smooth arch; dB."""
    return together(db - 20 * ((t - s) / length) ** 2 for s, length, db in rows)


def scene():
    """The work on the table, its reflections and the room noise."""
    on_table = pouring() + tumbling() + handling() + crushing() + lifting() + ticks() + popping()
    near = table(on_table) + dish() + bumps()
    return near + amp(-11.0) * kitchen(near) + room_noise()


# stereo width: f/Hz, side gain level/dB
WIDTH = [(30, 5.5), (100, 3), (300, -2.5), (1000, -2.5), (3000, -8), (5600, 3), (8000, -1.5), (11000, 6),
         (16000, 4)]


def record(dry):
    """Sets the stereo width over frequency, rounds off the loudest peaks and limits the band."""
    size = next_fast_len(N + 4096)
    hz = np.fft.rfftfreq(size, 1 / SR)
    side = irfft(rfft((dry[0] - dry[1]) / 2, size) * amp(read(WIDTH, hz)), size)[:N]
    ceiling = .8
    rounded = ceiling * np.tanh(widen(dry.mean(0), side, 0) / ceiling)
    lowpass = signal.firwin(201, 16100, window=("kaiser", 7), fs=SR)  # treble edge in Hz
    return signal.oaconvolve(rounded, lowpass[None], "same")


dry = scene()
out = record(dry)
master_out(out)
```